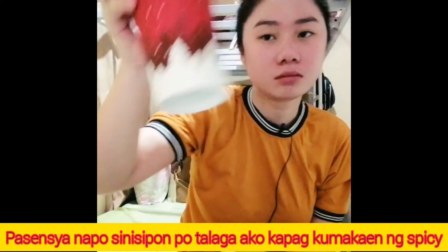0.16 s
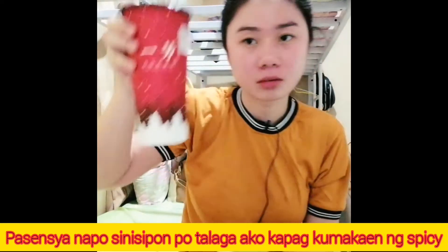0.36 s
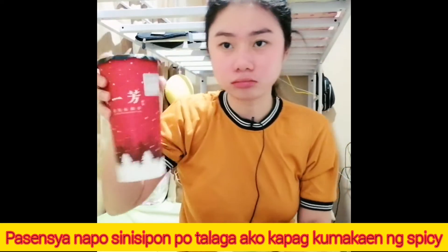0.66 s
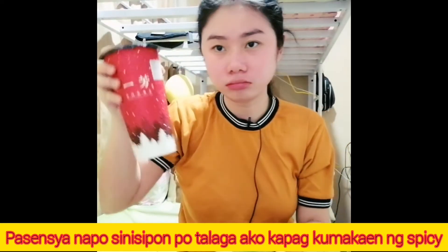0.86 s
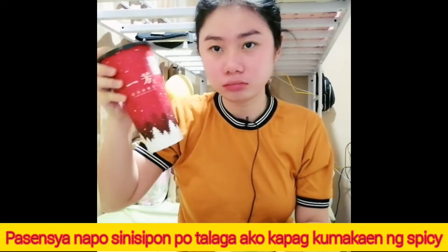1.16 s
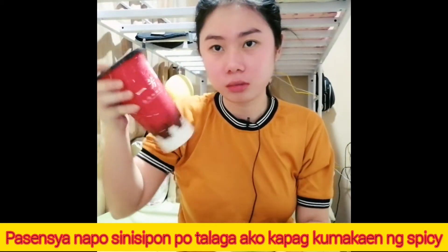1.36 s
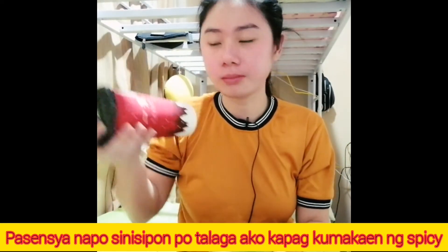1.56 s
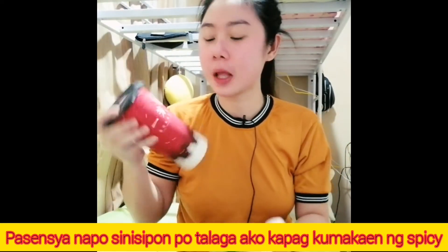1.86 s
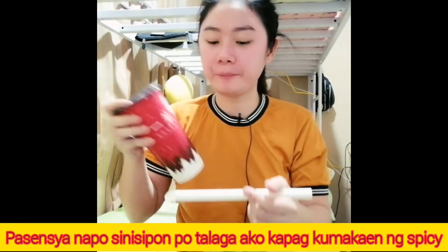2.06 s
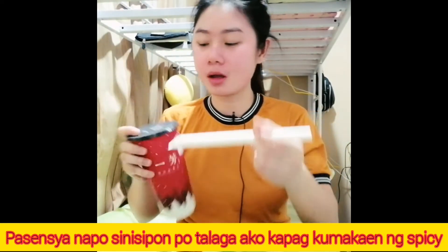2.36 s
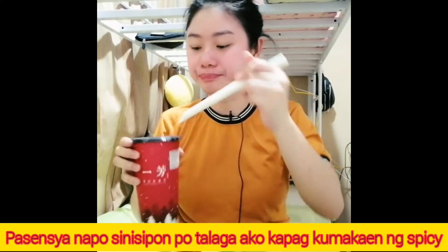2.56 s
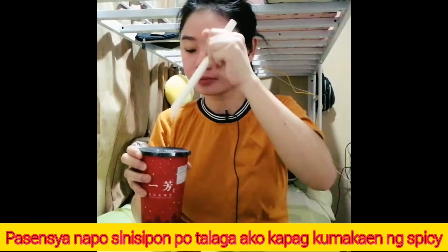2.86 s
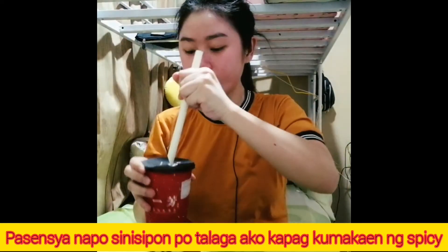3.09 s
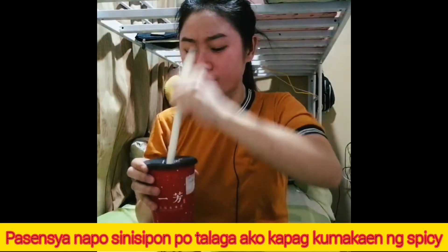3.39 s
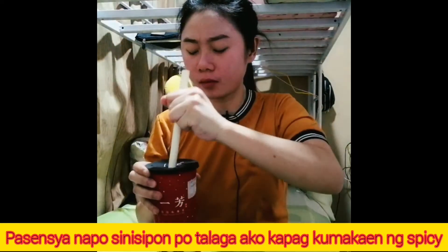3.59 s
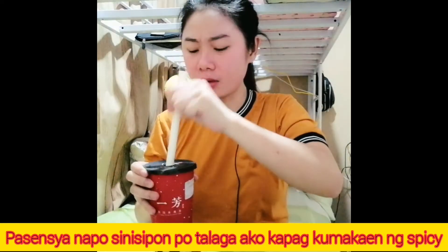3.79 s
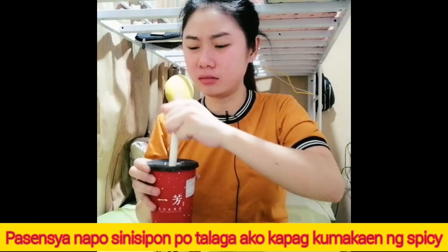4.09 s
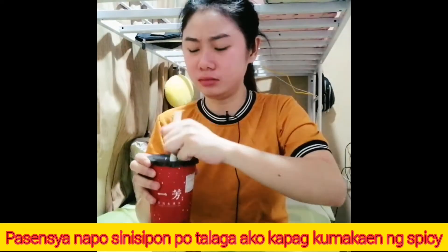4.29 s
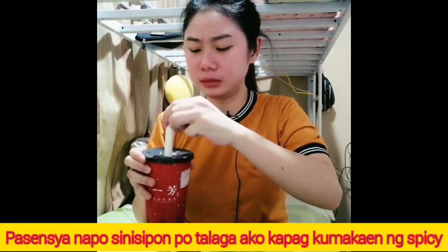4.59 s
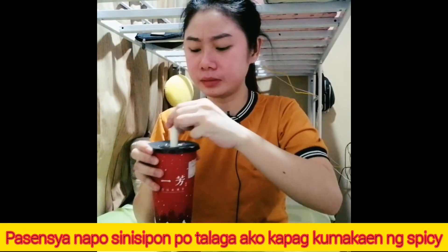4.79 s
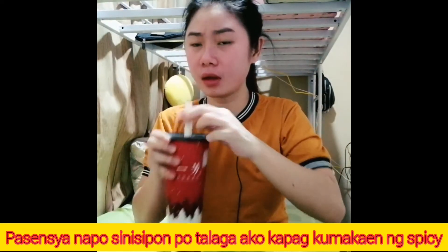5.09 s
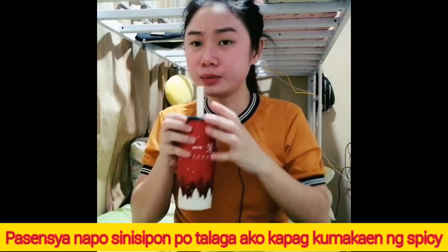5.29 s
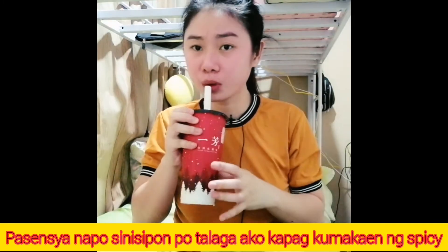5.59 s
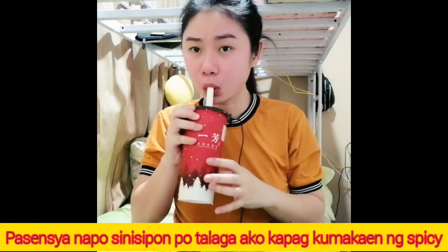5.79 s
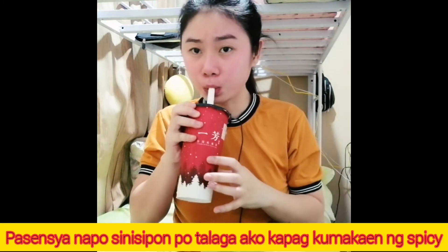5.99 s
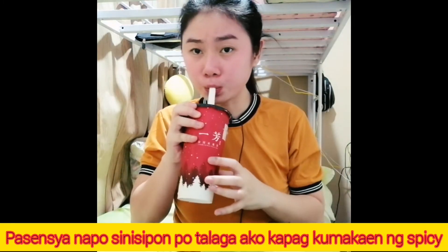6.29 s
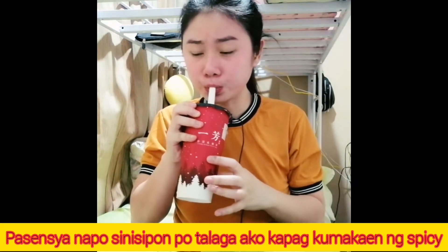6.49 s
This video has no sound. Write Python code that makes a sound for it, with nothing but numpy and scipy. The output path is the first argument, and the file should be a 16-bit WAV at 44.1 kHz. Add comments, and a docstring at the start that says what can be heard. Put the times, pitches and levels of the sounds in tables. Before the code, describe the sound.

Soft cup crackles and wrapper snaps, a sharp puncture, five harsh straw-on-lid squeaks with gaps, then quiet cable rumble and cloth rustle.

```python
"""A drink cup is turned in the hand and its wall buckles; a wide plastic straw is unwrapped, crinkling and snapping.
The straw is jabbed at the film lid, pops through, and is pushed and pulled in the hole: stick-slip friction drives
the lid, slow uneven slips creaking and fast ones locking into a squeak that overloads a close microphone.
The cup is then lifted and the sleeve settles. Throughout, the hands tug and brush the microphone cable,
light plastic ticks ring in narrow bands from 2.5 s on, and a fan of shaped noise runs in a small room."""
import sys
import numpy as np
from scipy import signal
from scipy.fft import rfft, irfft, next_fast_len
from scipy.io import wavfile

SR = 44100
rng = np.random.default_rng(int(sys.argv[2]) if len(sys.argv) > 2 else 0)


def materialize(psi):
    """Save the field psi as 16-bit PCM at rate SR to the path in sys.argv[1].

    A 1-D psi becomes a single channel; in a 2-D psi each row is a channel.
    """
    bounded = np.clip(np.atleast_2d(psi).T, -1, 1)
    quanta = np.round(bounded * 32767).astype(np.int16)
    wavfile.write(sys.argv[1], SR, quanta)


N = 293255
TIME = np.arange(N) / SR


def amp(db):
    """Level to gain: 20 dB is a factor of ten in amplitude."""
    return 10 ** (np.asarray(db) / 20)


def unit(x):
    """Normalisation of mean power: scale to rms 1."""
    return x / np.sqrt(np.mean(x ** 2) + 1e-20)


def unit_energy(x):
    """Normalisation of total energy: scale so that the squares sum to 1."""
    return x / np.linalg.norm(x)


def along(points, hz):
    """Interpolate (f/Hz, value) points on a logarithmic frequency axis."""
    f, v = np.transpose(points)
    return np.interp(np.log(hz + 1), np.log(f + 1), v)


def filtered(x, response):
    """Linear filtering: multiply the spectrum of x by a response of frequency."""
    size = next_fast_len(N + SR // 2)
    return irfft(rfft(x, size) * response(np.fft.rfftfreq(size, 1 / SR)), size)[:N]


def highpass(x, hz):
    """Second-order Butterworth high-pass."""
    return signal.sosfilt(signal.butter(2, hz, "high", fs=SR, output="sos"), x)


def noise(response):
    """Coloured noise: white noise shaped by a response, at rms 1."""
    return unit(filtered(rng.standard_normal(N), response))


def impulse(spectrum, size=8192):
    """Minimum-phase click of peak 1: folding the cepstrum makes the given spectrum causal."""
    cepstrum = irfft(np.log(amp(along(spectrum, np.fft.rfftfreq(size, 1 / SR))) + 1e-6))
    cepstrum[1:size // 2] *= 2
    cepstrum[size // 2 + 1:] = 0
    click = irfft(np.exp(rfft(cepstrum)))
    return click / np.abs(click).max()


def add(track, s, sound):
    """Superposition: mix a sound in at time s."""
    start = int(round(s * SR))
    track[start:start + len(sound)] += sound[:N - start]


def envelope(s, hold, attack, fade):
    """Linear rise to full gain at time s, a hold, then exponential decay."""
    gain = np.zeros(N)
    span = slice(max(int((s - attack) * SR), 0), int((s + hold + 10 * fade) * SR))
    t = TIME[span] - s
    rise = np.clip(1 + t / attack, 0, 1)
    gain[span] = rise * np.exp(-np.maximum(t - hold, 0) / fade)
    return gain


# speed of the straw in each stroke: (t/s, slip rate f/Hz)
FIRST_PUSH = [(3.642, 75), (3.668, 108.3), (3.70, 126), (3.742, 193), (3.765, 160), (3.79, 156)]
FIRST_PULL = [(4.038, 232.6), (4.097, 317.5), (4.12, 268.5), (4.146, 166)]
LONG_PUSH = [(4.15, 151.2), (4.23, 168.3), (4.285, 204.1), (4.35, 249.4), (4.366, 384.1), (4.42, 402),
             (4.438, 350.7), (4.454, 238.5)]
SECOND_PULL = [(4.732, 161.1), (4.76, 212.2), (4.785, 290.2), (4.815, 295.6), (4.841, 235)]
LAST_PUSH = [(5.025, 150.5), (5.042, 198.4), (5.07, 165), (5.102, 155.3)]
# friction of each stroke: (speed curve, relative level/dB at SQUEAK_RATE, swell t/s,
#   unevenness of the creak 0-1, slip rate f/Hz above which it locks into a squeak)
STROKES = [(FIRST_PUSH, -9, .04, .2, 200), (FIRST_PULL, -10.5, 0.024, 0.22, 220),
           (LONG_PUSH, -7.5, .004, .55, 175), (SECOND_PULL, -12, 0.036, 0.3, 250),
           (LAST_PUSH, -12.5, .001, 0.2, 210)]
SQUEAK_RATE, DB_PER_OCTAVE = 315, 3.5  # slips per s; faster is louder
START_DB = -11  # a stroke swells from this far down
LOCK_STEEPNESS, LOCKED_UNEVEN = 13, 0.062  # how suddenly the slips fall into step, and the scatter left then
SKID_S = .0035  # unevenness added per octave a second of change in speed


def friction(speed, db, swell_s, creak, lock_rate):
    """Speed-dependent friction: slip rate, level and unevenness all follow the straw's speed."""
    s, rate = np.transpose(speed)
    t = TIME[(TIME >= s[0]) & (TIME <= s[-1])]
    rate = np.interp(t, s, rate)
    octaves = np.log2(rate / SQUEAK_RATE)
    swell = START_DB * np.clip(1 - (t - t[0]) / swell_s, 0, 1)
    level = db + DB_PER_OCTAVE * octaves + swell
    creaking = creak / (1 + (rate / lock_rate) ** LOCK_STEEPNESS)
    skid = SKID_S * np.abs(np.gradient(octaves, t))
    return t, rate, level, np.clip(LOCKED_UNEVEN + creaking + skid, 0, 1)


def stroke(motion, jitter=.25, scatter_db=7, scrape_db=-7, scrape_s=0.0029):
    """Stick-slip: a train of force releases, uneven in a slow creak and regular in a fast squeak."""
    t, rate, db, uneven = motion
    cycles = np.cumsum(rate) / SR
    slips = np.interp(np.arange(int(cycles[-1]) + 1), cycles, t)  # one release per whole cycle
    pace, rough = np.interp(slips, t, rate), np.interp(slips, t, uneven)
    chance = rng.standard_normal((len(slips), 2))
    # dividing by the root of the rate keeps the power of the train independent of pace
    size = amp(np.interp(slips, t, db) + scatter_db * rough * chance[:, 0]) * np.sqrt(SR / pace)
    moments = slips + jitter * rough * chance[:, 1] / pace
    force = np.bincount(np.round(moments * SR).astype(int), size, N)[:N]
    # the edge of the hole scrapes for a moment after each release, most when the slips are uneven
    slide = np.exp(-TIME[:SR // 20] / scrape_s)
    scrape = signal.oaconvolve(force, unit_energy(slide))[:N] * rng.standard_normal(N)
    return force + amp(scrape_db) * 2 * np.sqrt(np.interp(TIME, t, uneven)) * scrape


def sharpened(force, motion, sharp_db=4, sharp_hz=9000, growth=2.2, rasp_db=-3, rasp_hz=2600, rasp_s=0.00079):
    """Nonlinear brightening: the harder the drive, the sharper each release and the more it rasps."""
    t, rate, db, uneven = motion
    loudest = max(row[1] for row in STROKES)
    drive = amp(growth * (db - loudest))
    slips, out = force[round(t[0] * SR):][:len(t)], force.copy()
    # rasp: noise that follows the short-term rms of the force
    keep = np.exp(-1 / (rasp_s * SR))
    rasp = np.sqrt(signal.lfilter([1 - keep], [1, -keep], slips ** 2)) * rng.standard_normal(len(t))
    sharp = amp(sharp_db) * highpass(slips, sharp_hz)
    add(out, t[0], drive * (sharp + amp(rasp_db) * highpass(rasp, rasp_hz)))
    return out


# the straw's tip strikes, pierces and snags the lid:
#   (t/s, relative strength level/dB, contact decay t/s, dull above f/Hz)
BLOWS = [(3.095, 0.5, 0.0079, 1840), (3.5231, 2.5, 0.0045, 9000), (3.525, 8, 0.0045, 14000),
         (3.5483, 5.5, 0.023, 2510), (3.702, -1, 0.00035, 9000), (3.781, -4, 0.00091, 9000),
         (4.132, -9.5, 0.00061, 8700), (4.153, -0.5, 0.00061, 9150), (5.0128, -9.5, 0.0027, 4000),
         (5.091, 0.5, 0.0044, 3000)]


def jabs(tear_db=-3, thin_hz=360, settle_db=-23, settle_s=.04):
    """Impact force: each blow is a push, a burst of stretching, tearing film, and a faint settling."""
    force, t = np.zeros(N), TIME[:SR // 8]
    for s, db, contact_s, dull_hz in BLOWS:
        decays = np.exp(-t / np.array([[contact_s], [settle_s]]))
        tear, settle = rng.standard_normal((2, len(t))) * decays
        push = t == 0
        blow = push + amp(tear_db) * unit_energy(tear) + amp(settle_db) * unit_energy(settle)
        dull = signal.butter(1, min(dull_hz, SR / 3), fs=SR)
        add(force, s, amp(db) * signal.lfilter(*dull, blow))
    # the sharp tip hardly moves the lid as a whole
    return highpass(force, thin_hz)


# spectrum of the taut lid over the cup's air: (f/Hz, relative spectrum level/dB)
LID_SPECTRUM = [(100, -40), (200, -9.5), (300, -9.5), (500, -5.5), (780, 5), (1100, 1.5), (1600, -7),
                (2000, -10.5), (2800, -18.5), (4500, -29), (5600, -39.5), (8000, -51.5), (15000, -69)]
# modes of the cup that ring on after each slip: (f/Hz, relative level/dB, 60 dB decay t/s)
CUP_MODES = [(241, -28, 0.044), (394.4, -35.5, 0.17), (532, -30.5, 0.093), (673, -12.5, 0.026),
             (750, -15.5, 0.04), (1080, -26, 0.14), (1340, -17.5, 0.028), (1750, -33, 0.068),
             (1900, -18, 0.015), (3160, -44.5, 0.16)]


def lid_response(flutter_db=-1, flutter_t60=0.032, ring_db=0):
    """Impulse response: a quick flap of the film, a flutter of its dense modes, and the cup's modal ring."""
    flap = impulse(LID_SPECTRUM)
    t = TIME[:len(flap)]
    dense = rng.standard_normal(len(t)) * amp(-60 * t / flutter_t60) * (1 - np.exp(-t / 0.00025))
    flutter = signal.fftconvolve(flap, unit_energy(dense))[:len(t)]
    ring = sum(amp(db - 60 * t / t60) * np.sin(2 * np.pi * hz * t) for hz, db, t60 in CUP_MODES)
    ring = ring * (1 - np.exp(-t / 0.00087))
    return unit_energy(flap + amp(flutter_db) * flutter + amp(ring_db) * ring)


def straw(motions, stroke_db=-1.0, jab_db=14):
    """Forced vibration: strokes and blows drive the lid; its dense modes are random for each short piece."""
    strokes = sum(sharpened(stroke(motion), motion) for motion in motions)
    force = amp(stroke_db) * strokes + amp(jab_db) * jabs()
    # overlapping pieces of the force each meet a freshly drawn set of dense modes
    out, hop = np.zeros(N), SR // 36
    fade = signal.get_window("hann", 2 * hop)
    for start in range(0, N - 2 * hop, hop):
        piece = fade * force[start:start + 2 * hop]
        if np.abs(piece).max() > 1e-6:
            add(out, start / SR, signal.fftconvolve(piece, lid_response()))
    return out


def heave(motion, first_db=-8, second_db=-5, lock=0.19, edge_s=0.0073):
    """Phase-locked motion: even slips swing the whole lid at the slip rate and at twice the rate."""
    t, rate, db, uneven = motion
    phase = 2 * np.pi * np.cumsum(rate) / SR
    inside = np.clip(np.minimum(t - t[0], t[-1] - t) / edge_s, 0, 1)
    gain = inside * amp(db) * np.exp(-(uneven / lock) ** 2)
    out = np.zeros(N)
    add(out, t[0], gain * (amp(first_db) * np.cos(phase) + amp(second_db) * np.cos(2 * phase)))
    return out


def squeak(motions, low_hz=185):
    """Radiation efficiency: the small lid radiates its lowest swings poorly."""
    swings = sum(heave(motion) for motion in motions)
    return filtered(swings, lambda hz: 1 / np.sqrt(1 + (low_hz / (hz + 1)) ** 16))


def crackle(density=180, spread_db=8.0, colour_db=5.5, life=0.0031, hiss=0.29):
    """Random-pulse noise: creases (density per s) of very unequal size, each decaying in its own colour."""
    at = np.flatnonzero(rng.random(N) < density / SR)
    size_db = spread_db * np.clip(rng.standard_normal(len(at)), -2, 2)
    decay, out = np.exp(-TIME[:SR // 20] / life), np.zeros(N)
    edges = [80, 600, 1200, 2000, 3000, 4200, 6000, 18000]  # Hz
    for lo, hi in zip(edges, edges[1:]):
        tint_db = colour_db * np.clip(rng.standard_normal(len(at)), -2, 2)
        kicks = np.bincount(at, amp(size_db + tint_db), N)
        bandpass = signal.butter(3, [lo, hi], "band", fs=SR, output="sos")
        band = signal.sosfilt(bandpass, rng.standard_normal(N))
        out += (unit(signal.oaconvolve(kicks, decay)[:N]) + hiss) * band
    return out


# spectrum of creasing thin plastic: (f/Hz, relative spectrum level/dB)
CREASE_SPECTRUM = [(150, -13), (400, -1), (900, -9), (2700, -5.5), (4700, -14), (6500, -26), (8500, -35.5),
                   (11000, -57), (15000, -54.5)]
# the fingers shift on the cup or pull at the wrapper: (t/s, hold t/s, fade per neper t/s, crinkle gain level/dB)
GRIPS = [(0.66, 0.53, .05, -65), (0.82, 0.15, .1, -63), (1.21, 0.048, 0.051, -58),
         (1.453, 0.064, 0.02, -47.5), (1.602, 0.02, 0.23, -53), (1.846, 0.12, 0.024, -43),
         (1.946, 0.13, 0.087, -41), (2.208, .16, .03, -46), (2.403, 0.022, 0.027, -45.5),
         (3.11, 0.071, 0.029, -48.5), (5.152, 0.076, 0.1, -50.5)]
GRIP_ATTACK_S = 0.0094


def handling(grip_db=0, rest_db=-73):
    """Crease noise under load: thin plastic crinkles at every grip, and faintly while the cup is just held."""
    grips = sum(amp(db + grip_db) * envelope(s, hold, GRIP_ATTACK_S, fade) for s, hold, fade, db in GRIPS)
    grip = amp(rest_db) + grips
    return signal.fftconvolve(grip * crackle(), unit_energy(impulse(CREASE_SPECTRUM)))[:N]


# spectrum of a buckling wall: (f/Hz, relative spectrum level/dB)
WALL_SPECTRUM = [(120, -11.5), (400, -2.5), (850, 5), (1400, 1.5), (2800, -6), (4700, -44), (7000, -37),
                 (12000, -73)]
# the cup's wall and the wrapper buckle: (t/s, relative level/dB, crisp edge level/dB added to that level)
SNAPS = [(0.481, -29.5, -28), (0.627, -27.5, -25), (0.733, -30, -50), (0.855, -23, -23.5),
         (0.867, -15, -23.5), (1.223, -25.5, -42.5), (1.246, -23.5, -28), (1.843, -34.5, 0),
         (1.888, -25.5, -7), (1.952, -29, 1.5), (1.989, -20.5, -16), (2.014, -17.5, -14.5),
         (2.063, -23.5, -31), (2.184, -21, -12), (2.198, -12.5, -21), (2.217, -13, -22.5),
         (2.245, -16.5, -25), (2.311, -11.5, -16.5), (2.409, -14, -24), (2.436, -14.5, -21)]


def buckles(snap_db=-7, buckle_s=0.012, buckle_db=-16, edge_db=1, edge_s=0.004, edge_hz=3000):
    """Snap-through buckling: a wall gives way in a short stutter, with a crisp edge on top."""
    wall, edge, t = np.zeros(N), np.zeros(N), TIME[:SR // 15]
    for s, db, crisp_db in SNAPS:
        stutter, fizz = rng.standard_normal((2, len(t)))
        snap = .5 * (t == 0) + amp(buckle_db) * stutter * np.exp(-t / buckle_s)
        add(wall, s, amp(db + snap_db) * snap)
        add(edge, s, amp(db + crisp_db + edge_db) * fizz * np.exp(-t / edge_s))
    crease = highpass(impulse(CREASE_SPECTRUM), edge_hz)
    body = signal.fftconvolve(wall, impulse(WALL_SPECTRUM))
    return (body + signal.fftconvolve(edge, unit_energy(crease)))[:N]


# light plastic ticks: (t/s, relative level/dB, pitch f/Hz)
TICKS = [(2.5188, -35.5, 3830), (2.694, -42, 2720), (2.7799, -25, 2620), (3.8534, -39.5, 3160),
         (3.919, -37.5, 2706), (3.957, -38.5, 2760), (4.9204, -30.5, 2500), (5.1574, -34, 2150),
         (5.2267, -47, 3800), (5.2754, -49, 2400), (5.423, -37.5, 2800), (5.4785, -34.5, 2660),
         (5.625, -45.5, 6900), (5.639, -31.5, 2700), (6.515, -37.5, 2770)]


def ticks(tick_db=-7, t60=0.041, width=0.18, attack=0.00036, click_db=1):
    """Damped resonance: each tick is a tiny crease that rings briefly in one narrow band."""
    out, t = np.zeros(N), TIME[:SR // 5]
    hz, crease = np.fft.rfftfreq(len(t), 1 / SR), impulse(CREASE_SPECTRUM)
    for s, db, pitch in TICKS:
        band = 1 / (1 + ((hz - pitch) / (width * pitch)) ** 2) ** 2
        ring = unit(irfft(rfft(rng.standard_normal(len(t))) * band, len(t)))
        add(out, s, amp(db + tick_db - 60 * t / t60) * (1 - np.exp(-t / attack)) * ring)
        thin = signal.butter(1, min(pitch, SR / 3), "high", fs=SR)
        add(out, s, amp(db + tick_db + click_db) * signal.lfilter(*thin, crease))
    return out


TUG_ATTACK_S, TUG_FADE_S = 0.075, 0.099


def arm(moves):
    """Envelope maximum of (t/s, length t/s, level/dB) rows: the strongest arm movement leads."""
    gains = [amp(db) * envelope(s, length, TUG_ATTACK_S, TUG_FADE_S) for s, length, db in moves]
    return np.max(gains, axis=0)


# spectrum of the cable's rumble: (f/Hz, relative spectrum level/dB)
RUMBLE_SPECTRUM = [(20, 3), (60, 1), (110, -5.5), (200, -13.5), (400, -48.5), (700, -83.5)]
# the arm pulls the microphone cable hard: (t/s, length t/s, rumble gain level/dB)
TUGS = [(.97, 0.12, -44), (1.2, 0.023, -39), (1.48, 0.061, -39.5), (3.17, 0.027, -32), (3.68, 0.081, -33),
        (5.57, 0.1, -37.5), (5.79, .06, -34.5), (6.04, 0.13, -35)]


def cable(rest_db=-53, grip_db=-43, stroke_db=-35):
    """Structure-borne noise: the microphone cable rumbles with every grip, stroke and tug."""
    moves = TUGS + [(s, hold, grip_db) for s, hold, fade, db in GRIPS]
    moves += [(speed[0][0], speed[-1][0] - speed[0][0], db + stroke_db) for speed, db, *_ in STROKES]
    rumble = noise(lambda hz: amp(along(RUMBLE_SPECTRUM, hz)))
    return np.hypot(amp(rest_db), arm(moves)) * rumble  # rest and movement add in power


LIFT_S, LIFT_FADE_S = 5.17, 0.68  # the cup is raised to the mouth and the sleeve settles


def sleeve(grip_db=-54, lift_db=-48, lift_attack_s=.1, rub_hz=720, rub_width_hz=420):
    """Rubbing noise: cloth brushes the cable at each grip and as the cup is lifted."""
    grips = arm([(s, hold, grip_db) for s, hold, fade, db in GRIPS])
    lift = amp(lift_db) * envelope(LIFT_S, 0, lift_attack_s, LIFT_FADE_S)
    rub = noise(lambda hz: 1 / (1 + (2 * (hz - rub_hz) / rub_width_hz) ** 2))
    return (grips + lift) * rub


# spectrum of the fan's rush of air: (f/Hz, relative spectrum level/dB)
AIR_SPECTRUM = [(60, -10.5), (100, -0.5), (290, -4), (380, 5.5), (560, -2.5), (660, -0.5), (800, -5),
                (1200, -6.5), (2000, -16), (2700, -18), (4000, -28), (8000, -38.5), (15500, -50)]
# the fan's hum and whine: (f/Hz, bandwidth f/Hz, relative level/dB)
FAN_TONES = [(366, 4.3, -59), (402, 12, -66.5), (420.8, 6, -58), (3744, 70, -76), (4880, 70, -89)]


def fan(air_db=-55, hum_db=-1):
    """Broadband and narrow-band noise: a steady rush with a fuzzy hum and a thin whine."""
    rush = amp(air_db) * noise(lambda hz: amp(along(AIR_SPECTRUM, hz)))
    hum = sum(amp(db) * noise(lambda hz: 1 / (1 + (2 * (hz - centre) / width) ** 2))
              for centre, width, db in FAN_TONES)
    return rush + amp(hum_db) * hum


# reverberation of the small room: (f/Hz, 60 dB decay t/s)
ROOM_DECAY = [(200, 0.28), (1000, 0.14), (4000, 0.2), (12000, 0.28)]


def room(x, build=0.0045):
    """Diffuse reverberation: a short tail from the nearby walls, decaying by frequency."""
    hz, t, z = signal.stft(rng.standard_normal(SR // 2), SR, nperseg=256)
    tail = signal.istft(z * amp(-60 * t / along(ROOM_DECAY, hz)[:, None]), SR)[1]
    tail = tail * (1 - np.exp(-(TIME[:len(tail)] / build) ** 2))
    return signal.fftconvolve(x, unit_energy(tail))[:N]


def scene():
    """Direct-to-reverberant ratio: the cup is close to the microphone; the small sounds are wetter."""
    motions = [friction(*row) for row in STROKES]
    loud = straw(motions) + squeak(motions)
    small = handling() + buckles() + ticks()
    near = loud + amp(-14.0) * room(loud) + small + amp(-8) * room(small)
    return (near + cable() + sleeve() + fan())[None]


def record(dry):
    """Saturation and band limit: the microphone flattens the biggest peaks and keeps nothing above 15.9 kHz."""
    flattened = dry[0] / (1 + np.abs(dry[0] / .96) ** 6) ** (1 / 6)
    return filtered(flattened, lambda hz: hz < 15900)[None]


dry = scene()
out = record(dry)
materialize(out)
```